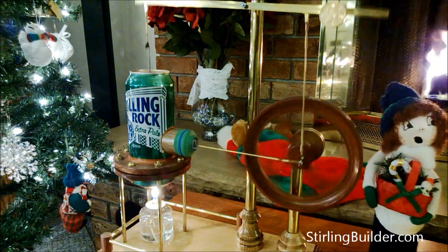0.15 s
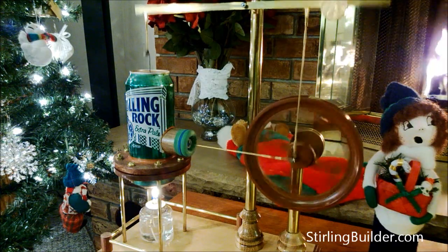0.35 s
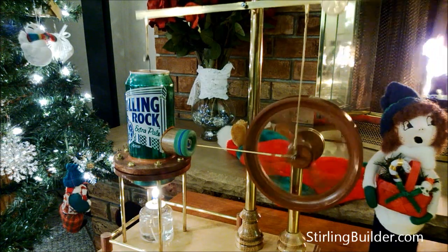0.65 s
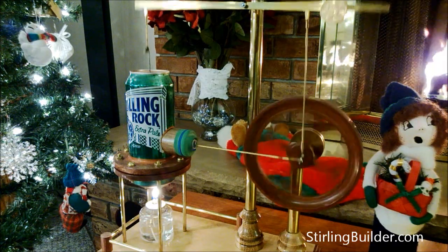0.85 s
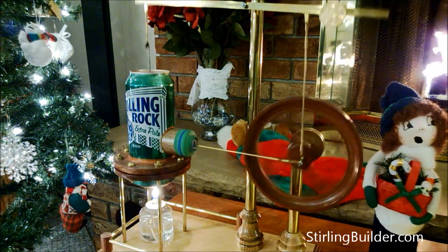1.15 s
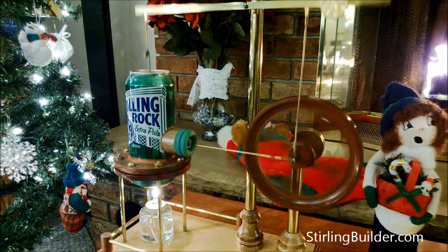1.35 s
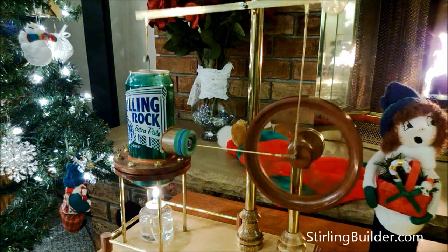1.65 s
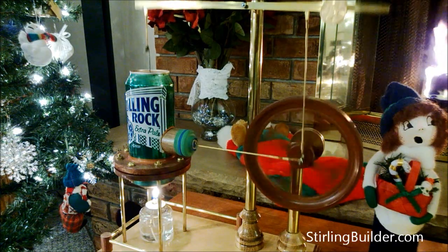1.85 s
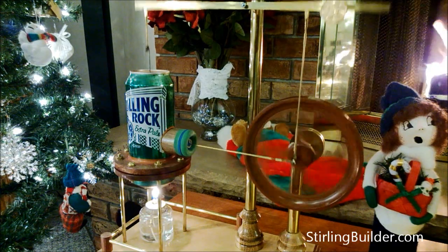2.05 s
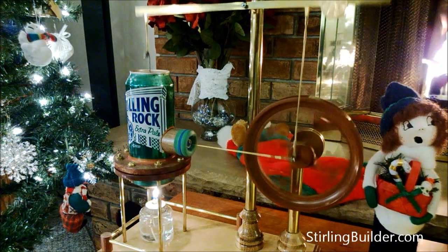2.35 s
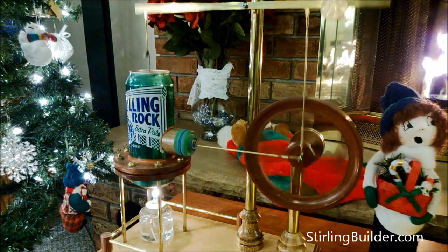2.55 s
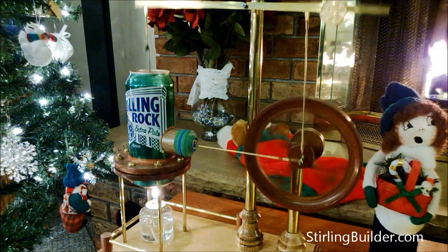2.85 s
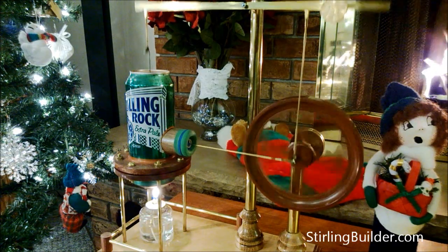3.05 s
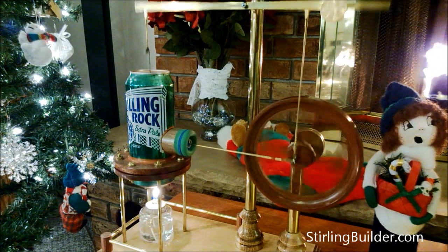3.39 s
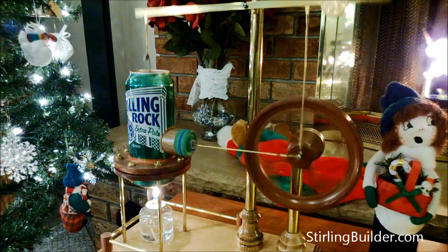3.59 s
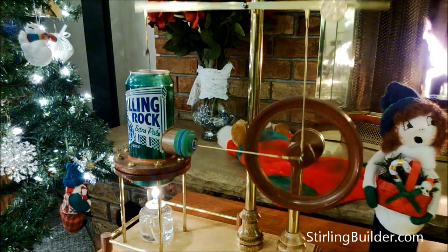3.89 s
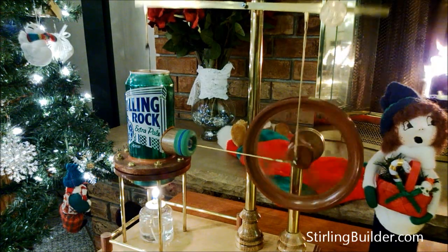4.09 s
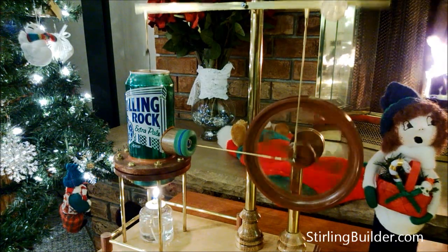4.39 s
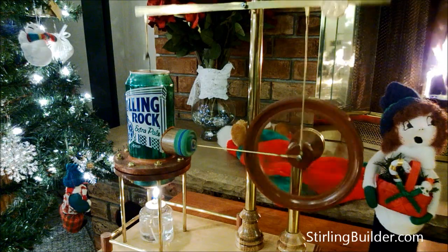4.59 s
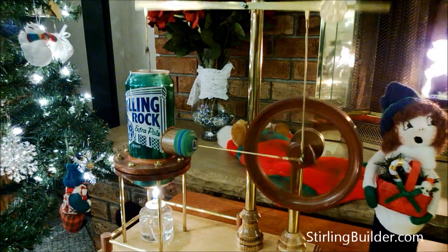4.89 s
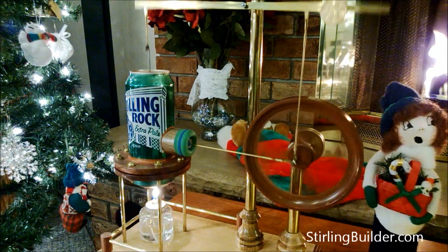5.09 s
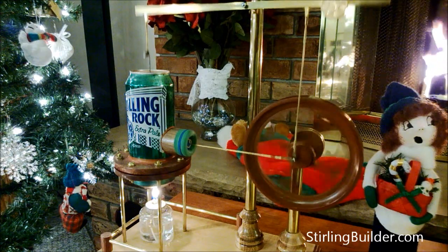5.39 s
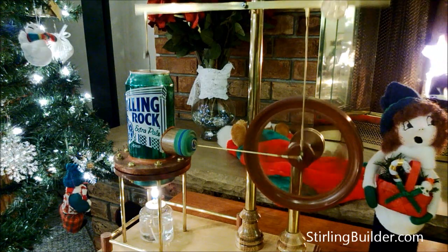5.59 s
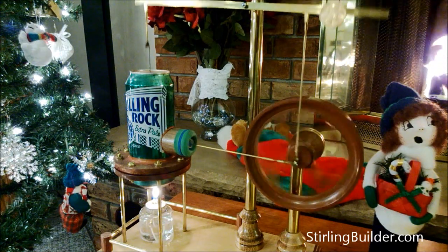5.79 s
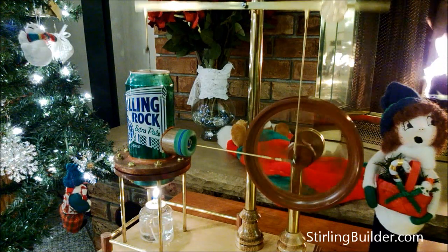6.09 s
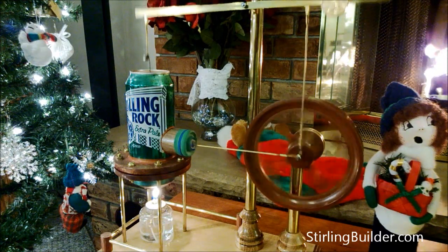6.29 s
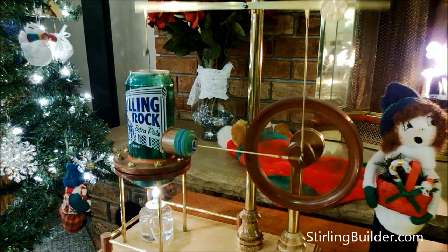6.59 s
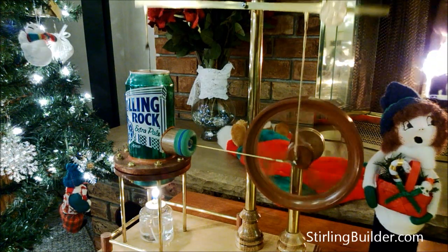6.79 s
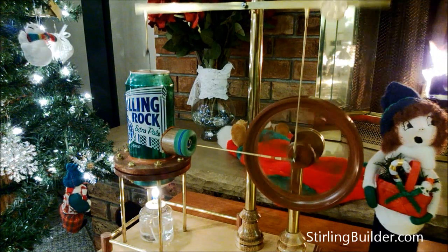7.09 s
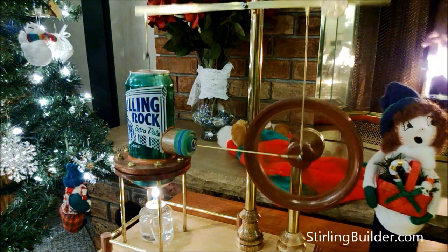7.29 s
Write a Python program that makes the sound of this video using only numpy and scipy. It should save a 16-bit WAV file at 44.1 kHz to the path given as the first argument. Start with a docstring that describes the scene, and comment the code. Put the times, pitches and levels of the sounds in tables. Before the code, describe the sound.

Already running at the start, a little metal engine on a wooden base repeats an even clicking cycle. The sharp metallic clack of linkage slack leads, a duller scrape and double thump follows, then a small tick and a loose soft tap. Blows vary slightly from turn to turn. Close, dry indoor pickup with quiet background rumble, hiss and a nearly inaudible electronic whine.

```python
"""First a triple clack over the low rumble and hiss of a quiet room, close to the camera's microphone.
A small hot-air engine turns about three times a second on a wooden base. Each turn the slack in its linkage
gives a faint tick, the triple clack, a scraping thump, a second tick and a soft tap.
Contact forces, single or grainy, ring modes of the base, the tin cylinder, the thin rods and the small pins;
sparse echoes add the room, and a faint high whine comes from the camera electronics."""
import sys
import numpy as np
from scipy import signal
from scipy.io import wavfile
from scipy.ndimage import uniform_filter1d

SR = 44100
rng = np.random.default_rng(int(sys.argv[2]) if len(sys.argv) > 2 else 0)


def waveform_to_disk(signal):
    """Save audio, clipped to [-1, 1], as 16-bit WAV at the path in sys.argv[1]."""
    frames = np.transpose(np.atleast_2d(signal))
    scaled = np.clip(frames, -1, 1) * 32767
    samples = np.round(scaled).astype(np.int16)
    wavfile.write(sys.argv[1], SR, samples)


N = 328545
LEAD = 2048  # samples of force before time zero


def gain_of(db):
    """Converts decibels to amplitude gain."""
    return 10 ** (np.asarray(db) / 20)


def unit(x):
    """Scales a burst to energy 1."""
    return x / np.sqrt(np.sum(x ** 2) + 1e-20)


# Room rumble and hiss at the microphone, spectrum before scaling: [f/Hz, level/dB per Hz]
ROOM_TONE = [(20, -2.5), (55, 7.5), (92, -3.5), (120, -2.5), (300, -2), (480, -16.5), (600, -13.5),
             (800, -22), (1050, -23.5), (1320, -21.5), (4400, -25), (6300, -29.5), (11000, -35.5),
             (15800, -33)]
# Camera electronics, steady sines: [f/Hz, level/dB]
CAMERA_WHINE = [(7192, -98), (8635, -100), (10067, -102), (11509, -102), (12952, -105)]
ROOM_TONE_DB = -61  # rms


def quiet():
    """Room rumble and microphone hiss as coloured, slightly patchy noise, with the camera's faint whine."""
    frames, hz = N // 256 + 5, np.fft.rfftfreq(1024, 1 / SR)
    real, imaginary, patches = rng.standard_normal((frames, 513, 3)).T
    # smooth over frequency, then over time
    patches = uniform_filter1d(uniform_filter1d(patches, 10, 0), 12, 1)
    patchy_db = .6 * patches / patches.std()
    table_hz, table_db = np.transpose(ROOM_TONE)
    colour_db = np.interp(np.log(hz + 1), np.log(table_hz + 1), table_db)
    spectrum = (real + 1j * imaginary) * gain_of(colour_db[:, None] + patchy_db)
    hiss = signal.istft(spectrum, nperseg=1024, noverlap=768)[1][:N]
    t = np.arange(N) / SR
    whine = sum(gain_of(db) * np.sin(2 * np.pi * f * t) for f, db in CAMERA_WHINE)
    return gain_of(ROOM_TONE_DB) * np.sqrt(N) * unit(hiss) + whine


def add(force, s, burst):
    """Adds a burst at time s to a force line, which starts a little before time zero."""
    part = force[LEAD + round(s * SR):][:len(burst)]
    part += burst[:len(part)]


def push(db, contact):
    """A smooth contact force lasting contact seconds: the longer the contact, the duller."""
    phase = np.clip(np.arange(300) / SR / contact, 0, 1)
    return gain_of(db) * np.sin(np.pi * phase) ** 2 / (contact * SR) * 2


def chatter(db, rise, hold, fall, grain_db):
    """Many tiny contacts of uneven size that rise, hold until hold seconds from the start, then decay."""
    t = np.arange(9000) / SR
    grain = gain_of(grain_db * np.minimum(rng.exponential(1, len(t)), 4))
    sizes = rng.standard_normal(len(t)) * grain
    envelope = np.clip(t / rise, 0, 1) * np.exp(-np.maximum(t - hold, 0) / fall)
    return gain_of(db) * unit(sizes * envelope)


def ring(force, modes, order, crack_db, spread_db, loose, count):
    """Rings decaying modes plus a short crack in their band; the force hops among count struck places."""
    columns = (0, 1, 2 + order)
    hz, t60, db = (np.array([m[k] for m in modes])[:, None] for k in columns)
    t, out = np.arange(12000) / SR, 0
    edges = [hz.min() * 1.001, min(hz.max() * 1.057, SR * .45)]
    band = signal.butter(2, edges, "band", fs=SR, output="sos")
    place = np.repeat(rng.integers(0, count, len(force) // 256 + 1), 256)[:len(force)]
    for k in range(count):
        # each place has its own mode levels and small detunings
        strength, detune = rng.standard_normal((2,) + hz.shape)
        decay = gain_of(db + spread_db * strength - 60 * t / t60)
        tones = unit((decay * np.sin(2 * np.pi * hz * (1 + loose * detune) * t)).sum(0))
        crack = gain_of(crack_db) * unit(signal.sosfilt(band, t == 0))
        body = signal.sosfilt(band, tones + crack)
        out = out + signal.oaconvolve(force * (place == k), body)[LEAD:LEAD + N]
    return np.sqrt(.03 * SR) * out  # energy 1 becomes rms 1 over 30 ms


# Modes of the wooden base, tin cylinder and thin rods, before any detuning and level spread:
# [f/Hz, t60/s, then level/dB when driven by clack, thump, tick, tap]
BASE_MODES = [(90.2, 0.34, -4.5, 0, -3, 5), (147.2, 0.19, -45, -1.5, -4.5, -23),
              (203, 0.16, 5.5, 2.5, -23, -5), (287, 0.13, -19, -7, -7, 1.5),
              (302.7, .14, -1, -3, 1.5, -4.5), (340, 0.089, -15, -2, -6, 1.5),
              (403.7, 0.036, 16, 1.5, -20, 11.5), (478, 0.026, -23, -2, -2, 2.5),
              (535.8, 0.069, 0, 0, -39, 4.5), (580.8, 0.1, -5.5, 0.5, -10.5, -0.5),
              (646.5, 0.27, -58, -34, -11.5, -12.5), (872, 0.045, -18, -7.5, -34, -5.5)]
CYLINDER_MODES = [(1250, 0.081, -59.5, 0.5, -29, 4), (1367, 0.048, 5.5, 1.5, 1, 0),
                  (1450, 0.034, 19.5, 2.5, -25, -1), (1650, 0.017, 18, 9, -2, -9),
                  (1949, 0.012, 26.5, 4.5, -2, -26), (2072, 0.12, 1.5, -40, -26, -36),
                  (2161, 0.046, 12, -33, -28, -9), (2319, 0.039, 2.5, 7, -10, -11),
                  (2612, 0.0098, -20, 7, -19, 10.5), (2810, 0.013, 13, -10, 1.5, -9),
                  (3084, 0.026, -13, 6, -6, -13)]
ROD_MODES = [(3200, 0.073, 1, -58, -25, 6), (3698, 0.023, -21, 13, -13, 12.5),
             (4000, 0.046, 7.5, 4, 9.5, -15), (4400, 0.026, 12.5, 8.5, 11.5, 9.5),
             (4740, 0.0077, 10.5, 11.5, 15, 6.5), (5124, 0.016, 16, 0, 13.5, -18),
             (5810, 0.016, 3, 2, 0, -5), (6400, 0.028, 0, -1.5, 0, -17.5), (7160, 0.014, 13, -5.5, -5, -23),
             (7500, 0.034, -20, -55, -21, -46), (8650, 0.028, 6.5, -64, -32, -44),
             (9290, 0.029, 9.5, -34, -36, -28), (9400, 0.028, -26, -34, -32, -21)]


def bodies(base, cylinder, rods, order, crack_db):
    """One kind of blow heard through base, cylinder and rods; order picks its column of mode levels."""
    low = ring(base, BASE_MODES, order, -38.5, 0, 0, count=1)
    middle = ring(cylinder, CYLINDER_MODES, order, crack_db, 1.5, .002, count=3)
    high = ring(rods, ROD_MODES, order, crack_db, 3.1, 0.025, count=6)
    return low + middle + high


# The main joint takes up its slack, levels before each burst's offset:
# [t/s, touch before it level/dB, rods at last blow level/dB, pins level/dB]
SLACK_CLACKS = [(-0.0084, -60, -51.5, -56.5), (0.326, -61, -49.5, -49), (0.6599, -57, -50, -81),
                (0.9952, -57.5, -52, -79), (1.3303, -64, -49.5, -76), (1.6638, -65, -50.5, -77),
                (1.9994, -64, -54.5, -70), (2.3342, -67, -50.5, -73), (2.6701, -68, -50, -71),
                (3.005, -69, -48, -63), (3.3416, -60, -51.5, -62), (3.6775, -61, -49, -60),
                (4.0152, -60, -52.5, -70), (4.3521, -64, -50.5, -62), (4.688, -64, -49, -58),
                (5.0254, -62, -51.5, -67), (5.3621, -56.5, -49.5, -76), (5.6999, -58.5, -52.5, -78),
                (6.0377, -60, -53.5, -61), (6.3757, -58, -54.5, -57), (6.7135, -57.5, -49.5, -47.5),
                (7.052, -57.5, -50.5, -79), (7.3904, -64, -51.5, -77)]
# The three blows inside one clack, levels added to the base and cylinder settings:
# [delay t/s, base contact t/s, base level/dB, cylinder level/dB]
BLOWS_IN_CLACK = [(-.0012, 0.0025, 0, -18), (0.011, 0.002, 3, -7), (0.0192, 0.0015, 1.5, -3.5)]
# Modes of the small pins, before detuning and level spread:
# [f/Hz, t60/s, level/dB when driven by clack, by thump]
PIN_MODES = [(9300, 0.0093, -32, 6), (10400, 0.0045, -8, -43), (11780, 0.0051, 2, 2),
             (12600, 0.011, -23, -13), (14140, 0.009, -17, 3)]
TOUCH_LEAD_S = .0125  # a pin touches this long before the clack
# reference levels, alike every turn; each burst adds its own offset
CLACK_BASE_DB, CLACK_CYLINDER_DB, RODS_FIRST_DB = -47.5, -50.5, -60


def clacks():
    """Taking up slack: a light touch, then three quick blows of fixed spacing, all pulling the base one way."""
    base, cylinder, rods, pins, lid = np.zeros((5, N + LEAD))
    base_db, cylinder_db, first_db = CLACK_BASE_DB, CLACK_CYLINDER_DB, RODS_FIRST_DB
    for s, touch_db, last_db, pins_db in SLACK_CLACKS:
        for delay, contact, low_db, mid_db in BLOWS_IN_CLACK:
            add(base, s + delay, -push(base_db + low_db, contact))
            add(cylinder, s + delay + .0005, -push(cylinder_db + mid_db, 0.00026))
        add(base, s + .02, chatter(base_db - 6.5, 0.0015, 0.015, 0.033, 0.77))
        add(cylinder, s, chatter(cylinder_db - 2.5, 0.00051, 0.017, 0.014, 2.8))
        # the last blow leaves a close pair of modes ringing
        add(lid, s + 0.018, push(cylinder_db - 5.5, 0.00028))
        add(rods, s + 0.00101, chatter(first_db - 4.5, 0.0012, 0.0037, 0.001, 1.6))
        add(rods, s + .0195, chatter(last_db - 6.5, 0.0001, 0.00056, 0.0019, 9))
        add(rods, s, chatter(last_db - 11.5, 0.0024, 0.036, 0.0039, 2.1))
        add(pins, s + .002, chatter(first_db - 21, .001, .003, 0.0022, 3))
        add(pins, s + 0.018, chatter(pins_db - 8.5, 0.00039, 0.0024, 0.0009, 5.1))
        add(pins, s + 0.02, chatter(pins_db - 13, .001, 0.01, .003, 5.5))

        # the light touch, the faint tick ahead of the clack
        touch_s = s - TOUCH_LEAD_S
        add(cylinder, touch_s, chatter(touch_db - 5.5, 0.00062, 0.0048, 0.0039, 2.8))
        add(rods, touch_s, chatter(touch_db - 11.0, 0.00033, 0.0011, 0.0051, 5.6))
        add(pins, touch_s, chatter(touch_db - 24, .001, .003, .002, 1.5))
    main = bodies(base, cylinder, rods, order=0, crack_db=-2.0)
    pin_ring = ring(pins, PIN_MODES, 0, -17, 5.7, 0.0085, count=2)
    lid_ring = ring(lid, CYLINDER_MODES[5:7], 0, -29, 2, 0.0034, count=3)
    return main + pin_ring + lid_ring


def room(x):
    """Room echoes: sparse reflections of random sign, whose treble dies faster."""
    echoes = np.zeros(SR // 2)
    at = np.arange(300, SR // 2 - 20, 20) + rng.integers(0, 20, (SR // 2 - 301) // 20)
    echoes[at] = rng.choice([-1., 1.], at.shape)
    hz, t, z = signal.stft(echoes, SR, nperseg=256)
    t60 = np.interp(np.log(hz + 1), np.log([200, 2000, 10000]), [.35, .25, .15])
    tail = signal.istft(z * gain_of(-60 * t / t60[:, None]), SR, nperseg=256)[1]
    return signal.oaconvolve(x, unit(tail))[:N]


# The stroke reverses: [t/s, looseness level/dB, first blows level/dB, second blows level/dB]
STROKE_THUMPS = [(0.074, 0.5, -42, -48.5), (0.409, 1.5, -43.5, -48), (0.743, 2, -40.5, -46.5),
                 (1.078, 1.5, -43, -47.5), (1.412, 2, -41.5, -45.5), (1.749, 5.5, -41, -47.5),
                 (2.083, 4, -38.5, -50), (2.422, 6, -39, -54), (2.756, 5.5, -40, -48),
                 (3.094, 5.5, -37, -41), (3.426, 4.5, -38, -53), (3.762, 0.5, -42.5, -50),
                 (4.097, -1, -43, -48.5), (4.436, 1, -39.5, -49), (4.772, 3, -42.5, -43.5),
                 (5.111, 3.5, -38.5, -45.5), (5.443, 1.5, -45, -44.5), (5.784, 0.5, -42, -47),
                 (6.12, 1, -44, -46.5), (6.458, 0, -41.5, -46.5), (6.796, 1, -45.5, -45.5),
                 (7.137, 0.5, -45, -44.5)]
# Blows of the first and second pair, levels added to those of the thump:
# [delay t/s, contact t/s, level/dB, direction (+1 or -1)]
FIRST_PAIR = [(.008, 0.0016, -8, 1), (0.0108, 0.0035, -2, -1)]
SECOND_PAIR = [(0.022, 0.0027, 1.5, 1), (.028, 0.0021, -1.5, 1)]
# a looser joint scrapes louder and longer, rattles more and makes the pins fizz:
# values at 0 dB looseness, then growth per dB; each burst adds its own level offset
SCRAPE_S, SCRAPE_S_PER_DB = .017, .0014
RISE_S, RISE_S_PER_DB = .001, .0008  # the rods come in more softly when loose
SCRAPE_DB, RATTLE_DB, FIZZ_DB = -55.5, -53.5, -76
RATTLE_PER_DB, FIZZ_PER_DB = 1.92, 2.5


def thumps():
    """Stroke reversal: a scrape starts with a ping, two pairs of heavy blows shake the base, a rattle dies."""
    base, cylinder, rods, pins, ping, wall = np.zeros((6, N + LEAD))
    for s, loose_db, first_db, second_db in STROKE_THUMPS:
        scrape_db = SCRAPE_DB + loose_db
        length = SCRAPE_S + SCRAPE_S_PER_DB * loose_db
        rods_rise = RISE_S + RISE_S_PER_DB * max(loose_db, 0)
        rattle_db = RATTLE_DB + RATTLE_PER_DB * loose_db
        fizz_db = FIZZ_DB + FIZZ_PER_DB * loose_db
        for db, blows in ((first_db, FIRST_PAIR), (second_db, SECOND_PAIR)):
            for delay, contact, blow_db, direction in blows:
                add(base, s + delay, direction * push(db + blow_db, contact))
        add(base, s + 0.01, chatter(rattle_db, 0.018, 0.019, 0.035, 6.5))
        add(ping, s, chatter(scrape_db - 3, .001, .003, .002, 2))
        add(wall, s + 0.017, chatter(rattle_db - 25.0, 0.0082, 0.0094, 0.02, 3.4))
        add(cylinder, s, chatter(scrape_db - 2.5, 0.012, length, 0.012, 3.2))
        add(rods, s, chatter(scrape_db - 6.0, rods_rise, length, 0.01, 5.3))
        # the pins fizz at each pair of blows
        add(pins, s + 0.0011, chatter(fizz_db - 9.5, 0.004, 0.0074, 0.0046, 3))
        add(pins, s + 0.012, chatter(fizz_db - 8.0, .004, 0.011, .003, 3))
    main = bodies(base, cylinder, rods, order=1, crack_db=-7.5)
    pin_ring = ring(pins, PIN_MODES, 1, -5, 3, 0.019, count=4)
    # the ping finds one mode of the cylinder, the rattle its two lowest
    ping_ring = ring(ping, CYLINDER_MODES[7:8], 1, -10, 0, 0.0027, count=1)
    wall_ring = ring(wall, CYLINDER_MODES[:2], 1, 9.3, 1.6, 0.0019, count=2)
    return main + pin_ring + ping_ring + wall_ring


# Stray knocks that follow some thumps, levels before each burst's offset: [t/s, level/dB]
STRAY_KNOCKS = [(1.4835, -55), (1.8175, -47.5), (2.1523, -49), (2.486, -50), (3.4914, -62), (4.834, -51),
                (5.179, -53)]
TICK_TURN = .581  # share of a turn after each clack
# mean levels before each burst's offset, and their random spread
TICK_RODS_DB, TICK_CYLINDER_DB, TICK_SPREAD_DB = -60, -64.5, 1.5


def ticks():
    """The piston slides with a low rumble until a short light contact ends the stroke; stray knocks join."""
    base, cylinder, rods = np.zeros((3, N + LEAD))
    starts = np.transpose(SLACK_CLACKS)[0]
    for s in starts[:-1] + TICK_TURN * np.diff(starts):
        rods_db, cylinder_db = [TICK_RODS_DB, TICK_CYLINDER_DB] + TICK_SPREAD_DB * rng.standard_normal(2)
        add(base, s - .07, chatter(-58.0, 0.0097, 0.075, 0.006, 1.7))  # sliding rumble
        add(cylinder, s, chatter(cylinder_db - 3.5, 0.00056, 0.0043, 0.0082, 0.64))
        add(rods, s, chatter(rods_db - 8.5, 0.00076, 0.0033, 0.0054, 1.9))
    for s, db in STRAY_KNOCKS:
        add(cylinder, s, chatter(db - 20, 0.0013, 0.0025, 0.0033, 2.5))
        add(rods, s, chatter(db - 27, .001, 0.0019, 0.0027, 3))
    return bodies(base, cylinder, rods, order=2, crack_db=-9)


# Soft taps with a short rattle, levels before each burst's offset: [t/s, rattle level/dB]
SOFT_TAPS = [(0.253, -57), (0.587, -64), (0.92, -61), (1.254, -58), (1.587, -62.5), (1.923, -58.5),
             (2.258, -58.5), (2.596, -58), (2.93, -63), (3.265, -61), (3.602, -60.5), (3.941, -62.5),
             (4.277, -59.5), (4.611, -62), (4.951, -61), (5.288, -61.5), (5.622, -62), (5.962, -59.5),
             (6.301, -62), (6.639, -58), (6.978, -58), (7.316, -60.5)]
TAP_BASE_OVER_DB = 9  # base reference above the rattle's, before each burst's offset


def taps():
    """A faint brush, a small blow, a loose rattle, and the piston rumbling on its way back."""
    base, cylinder, rods = np.zeros((3, N + LEAD))
    for s, rattle_db in SOFT_TAPS:
        base_db = rattle_db + TAP_BASE_OVER_DB
        add(base, s + 0.00317, -push(base_db - 10, 0.00033))
        add(base, s + 0.022, push(base_db - 6, 0.0014))
        add(base, s + 0.0064, chatter(base_db - 3.5, 0.01, 0.012, 0.0097, 4.2))
        add(base, s + .03, chatter(-58.0, 0.0061, 0.2, 0.02, 1.7))  # returning piston
        add(rods, s - .016, chatter(rattle_db - 18.5, 0.0025, 0.0066, 0.0037, 3.3))  # faint brush
        add(cylinder, s, chatter(rattle_db - 2.5, 0.00045, 0.0078, 0.018, 9.3))
        add(rods, s, chatter(rattle_db - 3.5, 0.00019, 0.0022, 0.0015, 4.8))
        add(rods, s + .004, chatter(rattle_db - 6.5, 0.0032, 0.017, 0.0032, 2.7))
    return bodies(base, cylinder, rods, order=3, crack_db=-23.5)


def scene():
    """The engine close by, its faint room echoes and the background."""
    background = quiet()
    engine = clacks() + thumps() + ticks() + taps()
    echoes = gain_of(-34.5) * room(engine)
    return (engine + echoes + background)[None]


EDGE_HZ = 15850


def record(dry):
    """The recorder's band limit: a steep low-pass filter."""
    low_pass = signal.firwin(511, EDGE_HZ, window=("kaiser", 9), fs=SR)
    return signal.oaconvolve(dry, low_pass[None], "same")


dry = scene()
out = record(dry)
waveform_to_disk(out)
```